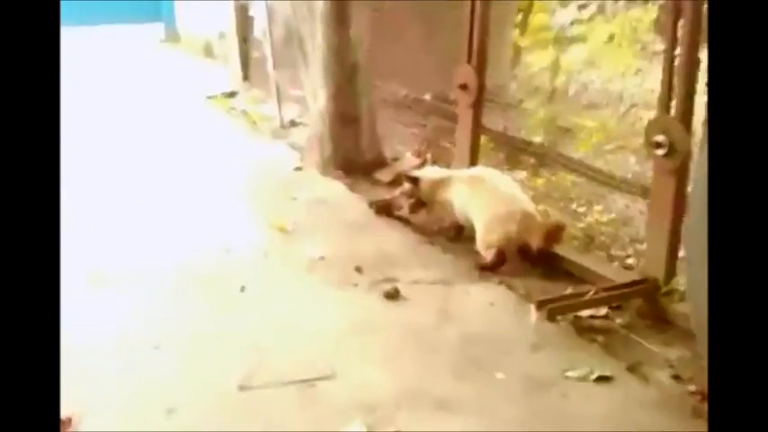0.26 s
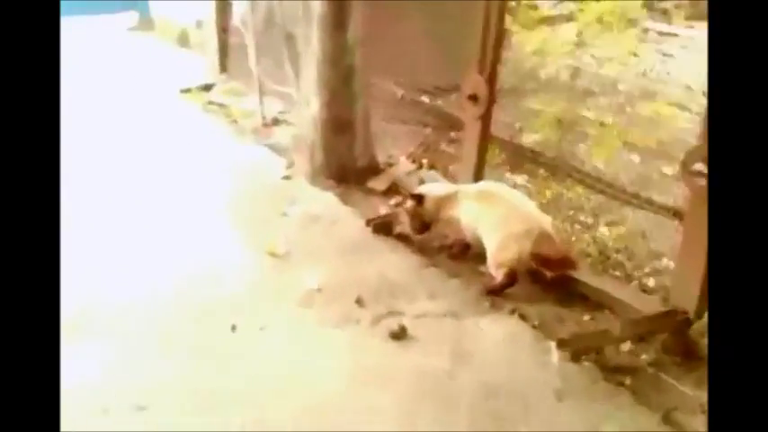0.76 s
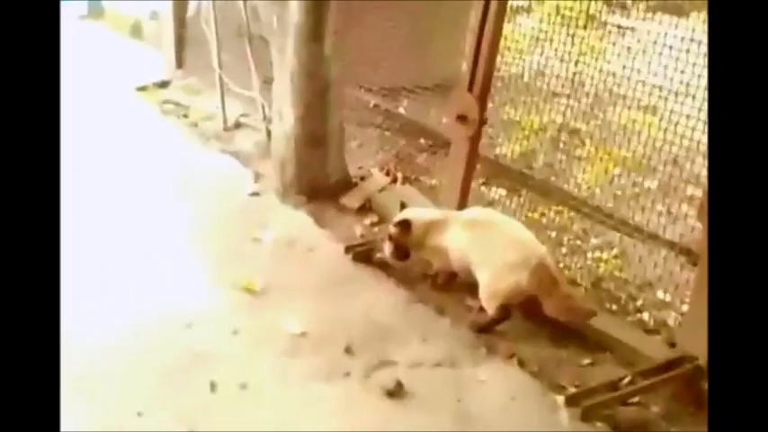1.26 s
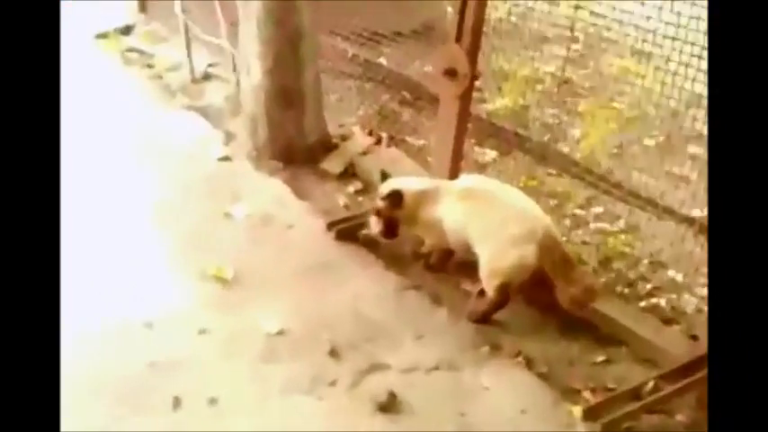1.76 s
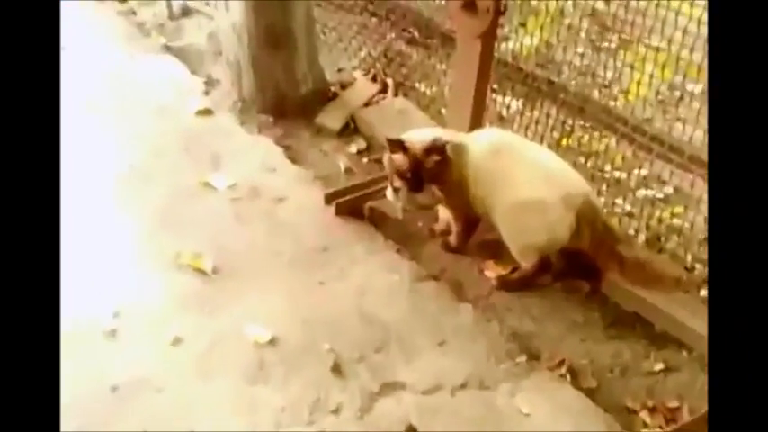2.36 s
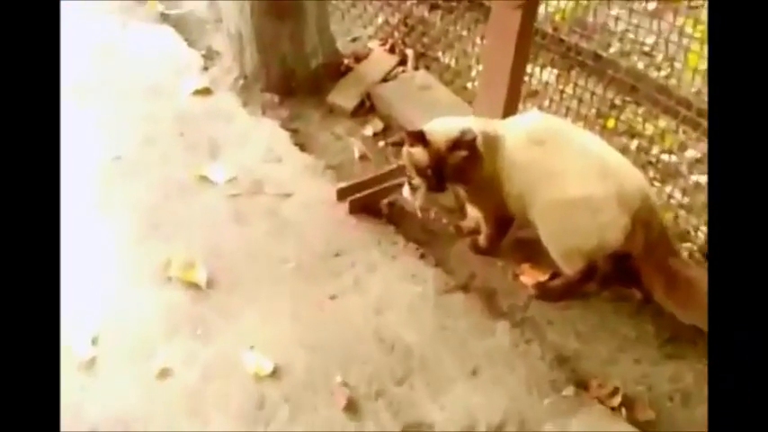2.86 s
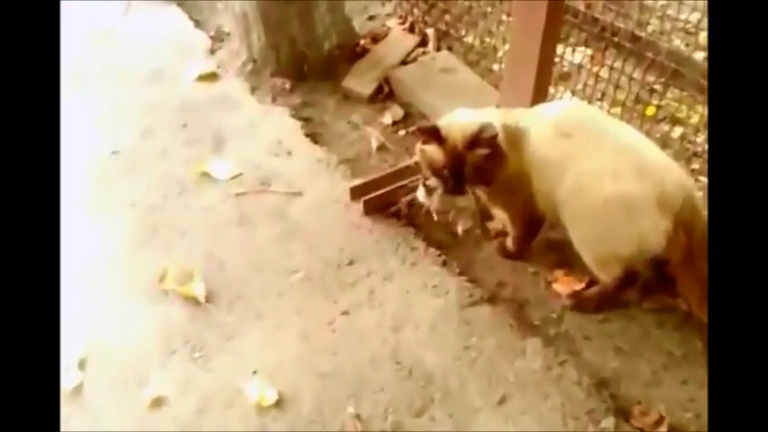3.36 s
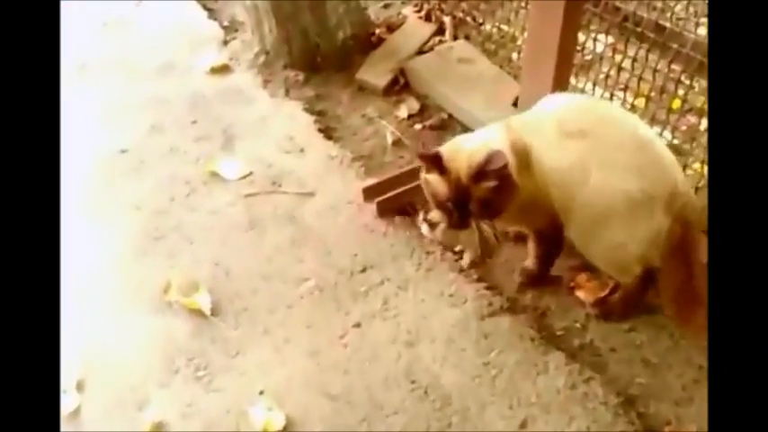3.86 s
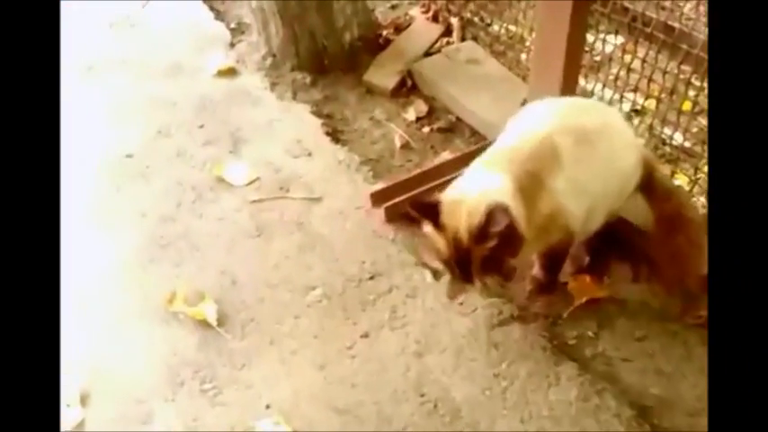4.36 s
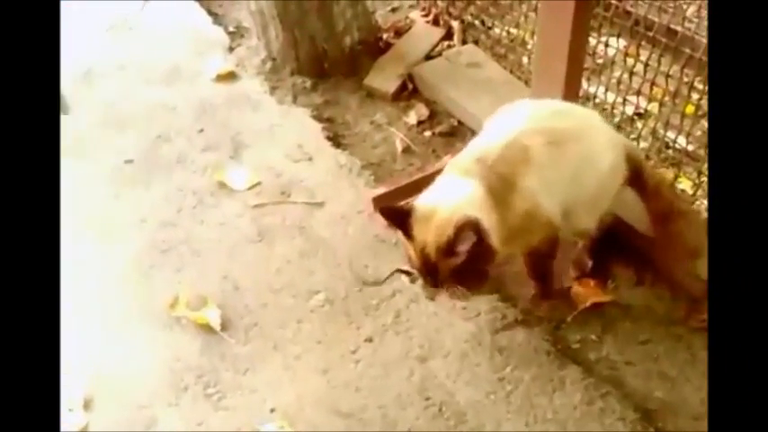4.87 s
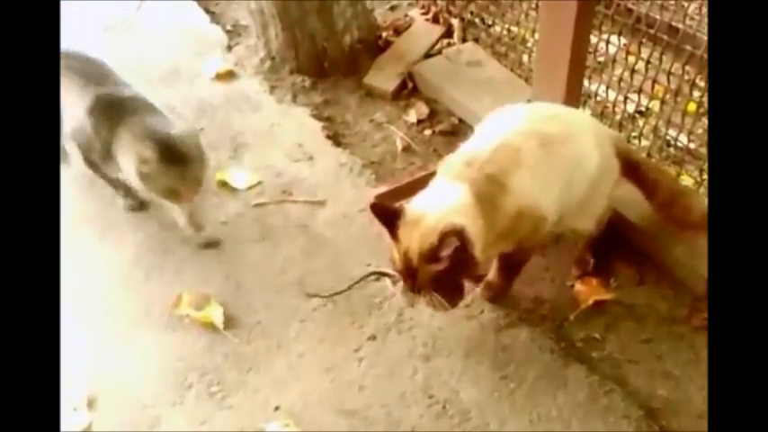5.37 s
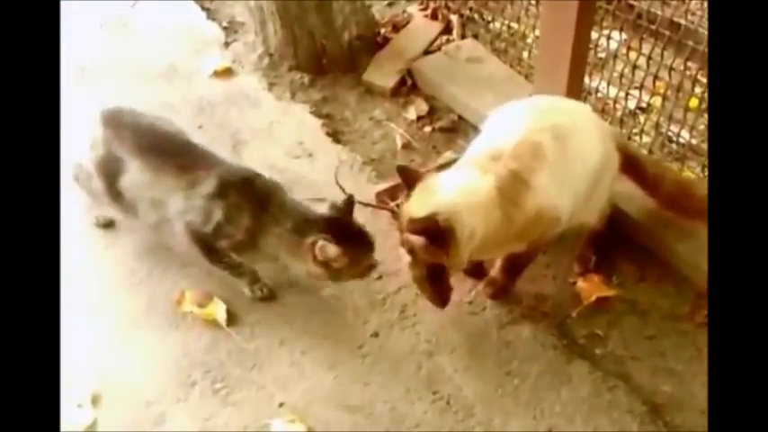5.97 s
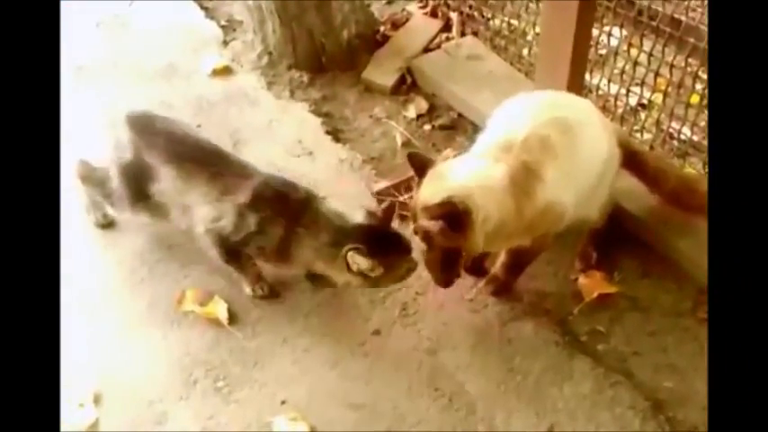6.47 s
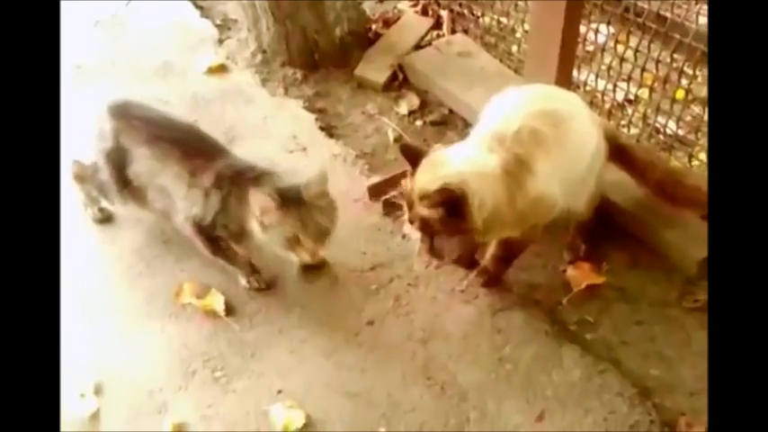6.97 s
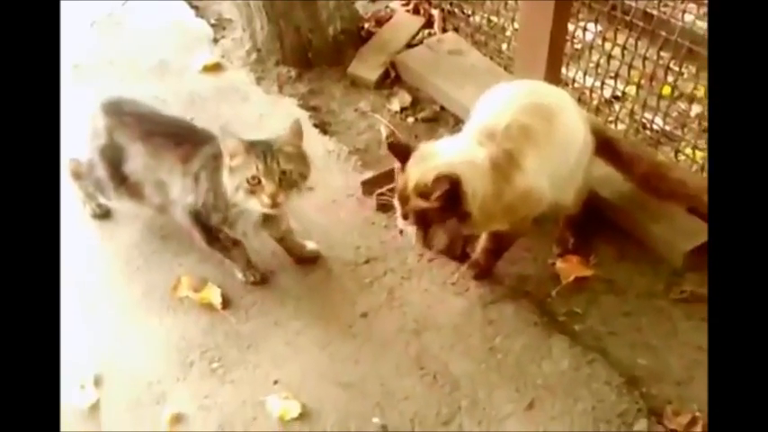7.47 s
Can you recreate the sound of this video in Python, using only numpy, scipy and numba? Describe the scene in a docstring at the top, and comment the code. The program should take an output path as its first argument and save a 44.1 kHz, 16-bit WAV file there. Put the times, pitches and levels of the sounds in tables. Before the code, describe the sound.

Over a faint outdoor hush, a caught rat lets out a string of about ten harsh, high squeals with short gaps, heard from a few steps away. The cries swell and cut off, flipping between a torn rasp and a clearer piercing note, and some break into stutters. Soft whimpers and slight paw crunches are barely there. A very faint, low cat growl joins under the last squeals.

```python
"""A rat squeals ten times in a yard, a couple of metres away, held in a cat's jaws.
Each cry swells, arches and is pinched off. The straining vocal folds flip between a note and
a rasp, and make the throat and mouth ring. Between squeals the rat whimpers softly.
Paws tick on grit, and near the end the cat growls faintly at a second cat.
A quiet outdoor hush lies under it all."""
import sys
import numpy as np
from scipy import signal
from scipy.fft import rfft, irfft
from scipy.io import wavfile
from scipy.ndimage import uniform_filter1d
from numba import njit

SR = 44100
rng = np.random.default_rng(int(sys.argv[2]) if len(sys.argv) > 2 else 0)


def generate_wav(signal):
    """Clip the signal to [-1, 1] and save it as 16-bit WAV at the path in sys.argv[1]."""
    frames = np.transpose(np.atleast_2d(signal))
    scaled = np.clip(frames, -1, 1) * 32767
    pcm = np.round(scaled).astype(np.int16)
    wavfile.write(sys.argv[1], SR, pcm)


N = 340452
TIME = np.arange(N) / SR


def squeals(flare_hz=550, falsetto_db=-9, rest_mouth_hz=3700, whistle_arch_hz=450, whistle_sag_hz=480):
    """The rat's vocal folds make its airway ring, at resonances that move as the jaw strains."""
    # The airway's upper resonances, heard as a rasp: f/Hz, width/Hz, relative level/dB
    rasp_bands = [(5035, 793, -1.5), (5783, 720, -4.5), (7860, 1510, -6.5)]
    age, cry = latest_cry()
    length_s, attack_s, db, swell_db, arch_db, chest_db, throat_db, rasp_db, whistle_db = cry[:9]
    first_throat_hz, last_throat_hz, deep_hz, whistle_hz, first_hz, last_hz, rough = cry[9:]
    surge_db, throat_surge_db, rasp_surge_db, whistle_surge_db, rasp_tilt = strain()
    along = np.clip(age / length_s, 0, 1)
    pitch_hz, rough = with_clear_notes(glide(first_hz, last_hz, along), rough)
    folds = vocal_folds(pitch_hz, rough)

    # both throat resonances slide together, and sink a little as the throat surges
    throat_hz = glide(first_throat_hz, last_throat_hz, along) * (1 - .011 * throat_surge_db)
    deep_hz = deep_hz * throat_hz / glide(first_throat_hz, last_throat_hz, 0.54)
    # the whistle follows the jaw, bends up in mid-cry and sinks towards the end
    mouth_hz = jaw()
    whistle_hz = whistle_hz + 0.95 * (mouth_hz - rest_mouth_hz)
    whistle_hz += whistle_arch_hz * (np.sin(np.pi * along) - .5) - whistle_sag_hz * (along - .5)
    # the harshest moments spread the mouth resonance upward
    rasp_db = rasp_db + rasp_surge_db
    spread_hz = flare_hz * np.clip((rasp_db + 9.5) / 7, 0, 1)
    # at the very highest pitches the throat and whistle fade
    falsetto = undb(falsetto_db * uniform_filter1d(1. * (pitch_hz > 2200), size=400))

    chest = undb(chest_db) * (undb(-3.5) * trembling(folds, 872, 340) + trembling(folds, 1230, 453))
    upper_throat = undb(-1.57) * trembling(folds, throat_hz + 130, 597)
    deep_throat = undb(-6) * trembling(folds, deep_hz, 257)
    throat = undb(throat_db + throat_surge_db) * (upper_throat + deep_throat)
    mouth = trembling(folds, mouth_hz + 0.11 * spread_hz, 700 + spread_hz)
    rasp = np.zeros(N)
    for hz, width, band_db in rasp_bands:
        tilt_db = rasp_tilt * (hz - rasp_bands[0][0]) / 1000
        rasp += undb(rasp_db - 5.5 + band_db + tilt_db) * saturated(folds, hz, width)
    whistle = undb(whistle_db + whistle_surge_db + 0.5) * trembling(folds, whistle_hz + 40, 1830)
    loudness = effort(age, length_s, attack_s, db + surge_db, swell_db, arch_db)
    return loudness * (chest + mouth + rasp + falsetto * (throat + whistle))


def latest_cry():
    """At every moment, the age in seconds of the rat's latest cry, and that cry's settings."""
    # The rat's cries; one or several in a row make a squeal. Levels and resonances are base values.
    # t/s, length/s, attack/s, level/dB, swell/dB, arch/dB, chest/dB, throat/dB, rasp/dB, whistle/dB,
    # first throat/Hz, last throat/Hz, deep throat/Hz, whistle/Hz, first pitch/Hz, last pitch/Hz,
    # roughness (0 is clean, 1 or more is fully rough)
    cries = [ (0.112, 0.85, 0.039, -45.5, -8, 3.5, -24.5, -14, -13.5, -10.5, 2010, 2040, 1747, 10350, 792, 907.6, 0.88),
             (1.211, .592, 0.058, -48.5, -3.5, 5.5, -19.5, -15, -17, -13.5, 2400, 2800, 1960, 9990, 1145, 1177, 1.04),
             (2.05, 0.2, .012, -48, 7.5, 2.5, -21.5, -12.5, -11.5, -3, 2338, 2210, 2070, 9530, 1098, 1031, 0.96),
             (2.271, 0.065, .001, -57.5, -3, -6, -15, -9.5, -8.5, -7, 1690, 1720, 1720, 9920, 1600, 1643, .75),
             (2.332, 0.12, 0.0077, -50.5, -2.5, -0.5, -27, -4.5, -20, -9.5, 2800, 2650, 2600, 9250, 1626, 1412, 1.06),
             (2.741, .402, 0.0099, -40.5, 4, 6.5, -28.5, -12.5, -19, -15, 2770, 2512, 2538, 10040, 1309, 1290, 1),
             (3.522, 0.54, 0.0027, -40.5, 7, 2.5, -27.5, -4, -11.5, -8.5, 2740, 2370, 2230, 10050, 862, 823.5, 1.01),
             (4.073, 0.016, 0.0016, -34.5, -8.5, 0.5, -39, -21, -10, -11.5, 2470, 2480, 2160, 9190, 1326, 1344, 0.74),
             (4.317, 0.38, 0.014, -41, -6, 8, -24.5, -9, -9, -6.5, 1960, 2444, 2000, 9925, 667.8, 772, 1.03),
             (4.922, 0.38, 0.0098, -42.5, 7, 7, -25.5, -9.5, -9, -13, 2148, 2360, 1916, 9700, 1044, 1023, .97),
             (5.536, .052, 0.0035, -49.5, 4, -0.5, -22, -4.5, 1, -4, 2726, 2673, 1657, 9860, 1355, 1482, 0.61),
             (5.597, 0.12, .006, -51, 2, 8.5, -9.5, 3, -3, -1, 2323, 2222, 1770, 10240, 806, 803, .99),
             (5.718, 0.12, 0.0022, -54, 1, 5, -10.5, 3.5, -1.5, -1, 2181, 2240, 1653, 9700, 804, 800, .99),
             (5.852, 0.072, 0.00058, -62, -8.5, 0, -1.5, 1.5, -6, -5.5, 2440, 2700, 1667, 8970, 1241, 1370, .7),
             (6.33, 0.49, 0.012, -41, 0.5, 6.5, -18.5, -4, -17.5, -9, 2460, 2013, 1706, 9956, 746.5, 750, 0.99),
             (6.803, .195, .0003, -45.5, -12.5, -1, -25, -13, -16.5, -17, 2791, 2650, 2260, 9840, 919.4, 958, 0.94),
             (7.273, .22, 0.011, -40.5, 0, 6, -33, -8, -13, -11, 2261, 1830, 1716, 10210, 900, 947, 0.89),
             (7.491, .19, 0.0028, -48.5, -2.5, 2.5, -46, 2.5, -16.5, -20, 1952, 1871, 1620, 10130, 950, 950, 1.04),
             ]
    rows = np.array(cries)
    latest = np.maximum(np.searchsorted(rows[:, 0], TIME) - 1, 0)
    start, *settings = rows.T[:, latest]
    return TIME - start, settings


def vocal_folds(hz, rough, waver=.024, jitter=.045, trill=.06, doubling=0.64, air=.33):
    """A wavering tone gives way to torn vibration, whose pitch leaps about as air hisses through."""
    wobble = rough * waver * flutter(160.4) + 0.00484 * flutter(42.3)
    tone, tone_phase = pulses(hz * np.exp(wobble), count=8)
    leaps = rough * (jitter * flutter(380) + trill * flutter(65))
    torn, torn_phase = pulses(hz * np.exp(leaps), count=18)
    # under strain strong and weak pulses alternate, adding tones halfway between the harmonics
    tone = tone * (1 + doubling * rough * np.cos(tone_phase / 2)) * undb(2.1 * flutter(34))
    torn = torn * (1 + doubling * rough * np.cos(torn_phase / 2))
    breathy = unit(torn * np.sqrt(hz)) + air * rng.standard_normal(N)
    torn = unit(breathy) * undb(2.07 * flutter(49))
    return np.sqrt(1 - rough ** 2) * 0.56 * unit(tone * np.sqrt(hz)) + rough * torn


def with_clear_notes(hz, rough):
    """The folds snap briefly onto a clearer note and back again."""
    # The clearer notes: t/s, length/s, first pitch/Hz, last pitch/Hz, roughness (0 to 1)
    clear_notes = [(.135, .1, 806.2, 816.1, 0.42), (2.743, .11, 1379, 1490, 0.74),
                   (5.05, 0.039, 2365, 2440, 0.72), (5.187, 0.062, 1726, 1609, .58),
                   (5.252, .1, 1290, 1320, 0.69), (5.795, .055, 1261, 1240, .9), (6.55, .21, 724, 783, .74),
                   (7.561, 0.097, 1635, 1607, 0.85), (7.669, 0.054, 1633, 1927, 0.32)]
    for start, length, first_hz, last_hz, note_rough in clear_notes:
        on = (TIME > start) & (TIME < start + length)
        hz = np.where(on, glide(first_hz, last_hz, (TIME - start) / length), hz)
        rough = np.where(on, note_rough, rough)
    return hz, np.clip(rough, 0, 1)


def effort(age, length_s, attack_s, db, swell_db, arch_db, onset_db=18.5, release_db_per_s=757):
    """The loudness of a cry: it rises, swells or sags while held, and is pinched off."""
    centred = np.clip(age / length_s, 0, 1) - .5
    attack = onset_db * np.exp(-np.maximum(age, 0) / attack_s)
    hold = db + swell_db * centred - arch_db * (2 * centred) ** 2
    release = release_db_per_s * np.maximum(age - length_s, 0)
    return uniform_filter1d(undb(hold - attack - release) * (age > 0), size=170)


def strain():
    """Surges of strain come and go smoothly, making a cry harsher or more piercing."""
    # What each surge adds at its peak:
    # t/s, half width/s, level/dB, throat/dB, rasp/dB, whistle/dB, rasp tilt/(dB per kHz)
    surges = [(.33, 0.1, -1, 1.5, 10, -4, -2.2), (.885, 0.024, 5, -11, -8, -13, 2),
              (.965, 0.015, 4.5, -4, 8, -6, -2), (2.22, 0.064, 0, 0, 7, -3, -2),
              (2.455, .015, 3, 1, -2.5, -10, 6.5), (2.89, 0.029, 1.5, -5, -3, 3, -1),
              (3.63, 0.094, 1.5, -1, -6, 4.5, 2), (3.97, 0.06, 0.5, 5, 7, 1, 2),
              (4.46, 0.055, 2, -10.5, -3, -8.5, 0), (4.6, 0.053, -0.5, 4, 2, -3.5, -2),
              (4.98, 0.041, -1.5, 4, -2, -4, 0.5), (5.075, 0.05, -1.5, 0.5, 10.5, -3, 0),
              (5.27, .04, 3.5, -9, -4.5, 1.5, -3), (5.67, 0.35, 0, 0.5, -5, 0, 4),
              (6.34, 0.037, 0, 3, -6, -9, -2), (6.6, 0.089, -1, -1, 0, 3.5, 3.5),
              (6.77, 0.082, -1.5, -1, 14.5, 5, -1), (6.85, 0.024, 4, 0.5, -7, 3, -1),
              (7.45, 0.054, 0, 3.5, 15, 1.5, -4.5)]
    return sum(np.outer(change, np.exp(-((TIME - peak_s) / width_s) ** 2))
               for peak_s, width_s, *change in surges)


def jaw():
    """The mouth's resonance in Hz, which rises as the jaw opens."""
    # The path of that resonance, one list of points for each squeal: t/s, f/Hz
    mouth_paths = [
        [(0.11, 3440), (0.174, 3900), (0.598, 3850), (0.654, 3780), (0.842, 3870), (1.01, 3850)],
        [(1.21, 3600), (1.272, 3450), (1.334, 3820), (1.83, 3830)],
        [(2.052, 3475), (2.3, 4130), (2.33, 3430), (2.432, 3130), (2.48, 3550)],
        [(2.745, 3200), (2.817, 3180), (2.849, 3340), (2.933, 3595), (3.17, 3630)],
        [(3.524, 3520), (3.88, 3670), (4.024, 3428), (4.072, 3850), (4.11, 3850)],
        [(4.32, 3900), (4.45, 3640), (4.506, 3952), (4.662, 3555), (4.72, 4000)],
        [(4.93, 3920), (5.002, 3737), (5.064, 4505), (5.234, 3695), (5.33, 3780)],
        [(5.537, 3970), (5.577, 4234), (5.607, 3900), (5.825, 3696), (5.871, 3160), (5.93, 3700)],
        [(6.335, 3640), (6.361, 3310), (6.419, 3750), (6.943, 3800), (7.02, 3280)],
        [(7.277, 3292), (7.451, 3993), (7.519, 3970), (7.549, 3540), (7.7, 3890)],
    ]
    return curves([point for squeal in mouth_paths for point in squeal])[0]


def trembling(folds, hz, width, drift=0.018, shake_db=1.14, rate_hz=17):
    """A saturated resonance that trembles by itself in tuning and level."""
    ringing = saturated(folds, hz * (1 + drift * flutter(rate_hz)), width)
    return ringing * undb(shake_db * flutter(rate_hz))


def saturated(x, hz, width, hold=0.52):
    """A resonance driven to its limit, so that its swing stays fairly even."""
    ringing = formant(x, hz, width)
    swing = np.sqrt(np.abs(uniform_filter1d(ringing ** 2, size=260)) + 0.0038)
    return unit(ringing / swing ** hold)


def whimpers(jitter=0.044, air=0.16, width_hz=550):
    """Between squeals the slack folds give short, low, nearly clean notes."""
    # The rat's soft notes: t/s, length/s, first pitch/Hz, last pitch/Hz, resonance/Hz, level/dB
    soft_notes = [(-.04, 0.07, 470, 444, 640, -64.5), (1.024, 0.071, 543, 520, 830, -72),
                  (1.089, 0.068, 540, 584, 736, -59.5), (1.913, 0.055, 475, 558, 1030, -73),
                  (2.49, 0.049, 754, 686, 740, -71.5), (3.231, 0.063, 433, 434, 858, -65.5),
                  (3.268, 0.084, 555, 442, 582, -72), (5.364, 0.054, 405, 457, 1030, -64),
                  (5.398, 0.054, 468, 563, 770, -62.5), (7.101, 0.092, 505.5, 524, 690, -70.5),
                  (7.133, 0.046, 527, 501, 1587, -60)]
    out = np.zeros(N)
    for start, length, first_hz, last_hz, resonance_hz, db in soft_notes:
        on = (TIME > start) & (TIME < start + length)
        along = (TIME[on] - start) / length
        pitch_hz = glide(first_hz, last_hz, along) * (1 + jitter * flutter(170)[on])
        tone, _ = pulses(pitch_hz, count=3)
        breathy = unit(tone) + air * rng.standard_normal(len(tone))
        out[on] += undb(db) * formant(breathy, resonance_hz, width_hz) * np.sin(np.pi * along)
    return out


def paw_steps(decay_s=0.011, gain_db=-10):
    """Grit crunches briefly under a paw."""
    # The crunches: t/s, relative level/dB, centre f/Hz
    crunches = [(0.0408, -56, 5170), (0.0596, -60.5, 5600), (3.317, -53.5, 4720), (3.3662, -63, 4830),
                (3.4272, -61, 4210)]
    out = np.zeros(N)
    for start, db, hz in crunches:
        age = np.maximum(TIME - start, 0)
        grit = unit(ring(rng.standard_normal(N), hz, width=3200))
        out += undb(db + gain_db) * grit * np.exp(-age / decay_s) * (age > 0)
    return out


def growl(fall_db_per_harmonic=0.5):
    """The cat makes a low, wavering drone through its closed mouth."""
    # The course of the growl: t/s, pitch/Hz, level/dB
    growl_path = [(6.15, 136.8, -102), (6.23, 135.8, -82), (6.32, 150, -78), (6.45, 142.8, -84),
                  (6.6, 150.4, -79), (6.85, 146.7, -80.5), (7.1, 143.6, -82.5), (7.35, 136.8, -82.5),
                  (7.72, 130.9, -81.5)]
    hz, db = curves(growl_path)
    phase = 2 * np.pi * np.cumsum(hz * (1 + 0.021 * flutter(27))) / SR
    drone = sum(undb(-fall_db_per_harmonic * k) * np.sin((k + 1) * phase) for k in range(4))
    return unit(drone) * undb(db + 0.76 * flutter(9.1)) * (TIME > growl_path[0][0])


def yard_echo(x, fade_s=0.17, echo_db=-4.0, gap_s=0.0034):
    """Ground, wall and tree scatter the sound, adding a short tail that falls 60 dB in fade_s."""
    age = TIME[:SR // 2]
    tail = rng.standard_normal(len(age)) * undb(-60 * age / fade_s) * (age > gap_s)
    return x + undb(echo_db) * signal.fftconvolve(x, tail / np.linalg.norm(tail))[:N]


def microphone_port(x):
    """The microphone's small opening lifts some narrow bands and hollows out others."""
    # The opening's peaks and dips: f/Hz, width/Hz, gain/dB
    port_bands = [(1440, 100, -2), (3180, 170, 1), (3680, 240, -1.5), (4176, 370, 3), (4260, 340, -4),
                  (4870, 60, 4.5), (5960, 190, 5), (6580, 1230, 4.5), (10070, 60, 4)]
    for hz, width, db in port_bands:
        x = x + (undb(db) - 1) * ring(x, hz, width)
    return x


def yard_air(hush_db=-71, restless_db=-81.5):
    """A faint, steady outdoor hush, whose middle range slowly rises and falls."""
    # The hush from bass to treble: f/Hz, relative level/dB
    hush_spectrum = [(25, -1.5), (60, -25), (85, -0.5), (110, -7), (150, -10.5), (250, -4.5), (400, -1),
                     (800, -3.5), (1500, -4), (2800, -7.5), (4000, -6), (6500, -10), (11000, -14.5)]
    hz, db = np.transpose(hush_spectrum)
    bins_hz = np.maximum(np.arange(N // 2 + 1) * SR / N, 1)
    colour = undb(np.interp(np.log(bins_hz), np.log(hz), db))
    hush = irfft(rfft(rng.standard_normal(N)) * colour, N)
    restless = formant(rng.standard_normal(N), 690, 650) * undb(restless_db + 0.95 * flutter(1.2))
    return unit(hush) * undb(hush_db + 0.17 * flutter(27)) + restless


def pulses(hz, count):
    """Sharp pulses and their phase, built from equal harmonics (multiples of the pitch) below SR / 3."""
    phase = 2 * np.pi * np.cumsum(hz) / SR
    return sum(np.cos(k * phase) * (k * hz < SR / 3) for k in range(1, count + 1)), phase


def formant(x, hz, width, split=0.39):
    """Three staggered resonances in a row pass one band with a flat top and steep sides."""
    for step in (-1, 0, 1):
        x = ring(x, hz + step * split * width, width * (1 - abs(step) * 0.057))
    return unit(x)


def ring(x, hz, width):
    """One resonance: sound at its centre passes unchanged, the rest is weakened."""
    return moving_bandpass(x, hz + np.zeros(len(x)), width + np.zeros(len(x)))


@njit
def moving_bandpass(x, hz, width):
    """A state-variable filter: it passes one band, whose centre and width (in Hz) may move."""
    out, band_state, low_state = np.empty(len(x)), 0., 0.
    for i in range(len(x)):
        tuning, damping = np.tan(np.pi * hz[i] / SR), width[i] / hz[i]
        band = (band_state + tuning * (x[i] + 1e-18 - low_state)) / (1 + tuning * (tuning + damping))
        band_state = 2 * band - band_state
        low_state += 2 * tuning * band
        out[i] = damping * band
    return out


def flutter(rate_hz):
    """A smooth random wobble that changes about rate_hz times a second."""
    lowpass = signal.butter(2, min(rate_hz, 8000), fs=SR, output="sos")
    return unit(signal.sosfilt(lowpass, rng.standard_normal(N)))


def curves(rows):
    """Join a table's points with straight lines in time, one curve for each column after the first."""
    times, *columns = np.transpose(rows)
    return [np.interp(TIME, times, column) for column in columns]


def glide(first, last, along):
    """A straight slide from first to last as along goes from 0 to 1."""
    return first + (last - first) * along


def undb(db):
    """Turn decibels into a number to multiply by."""
    return 10 ** (np.asarray(db) / 20)


def unit(x):
    """Scale a signal to an average strength (rms) of 1."""
    return x / np.sqrt(np.mean(x ** 2))


def scene():
    """All sounds reach one microphone, heard alike in both ears; the soft growl raises no echo."""
    animals = yard_echo(squeals() + whimpers() + paw_steps()) + growl()
    return np.tile(microphone_port(animals) + yard_air(), (2, 1))


def record(dry, top_hz=10950):
    """A small camera cuts off the highest treble steeply."""
    return signal.sosfilt(signal.ellip(12, .2, 70, top_hz, fs=SR, output="sos"), dry)


dry = scene()
out = record(dry)
generate_wav(out)
```